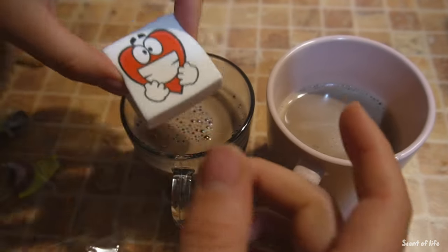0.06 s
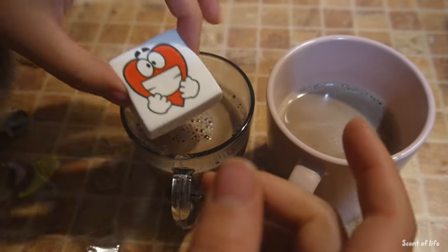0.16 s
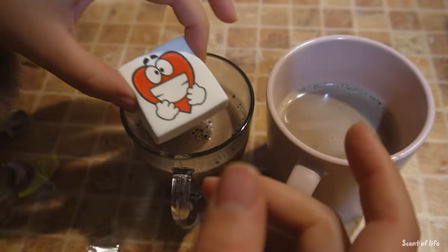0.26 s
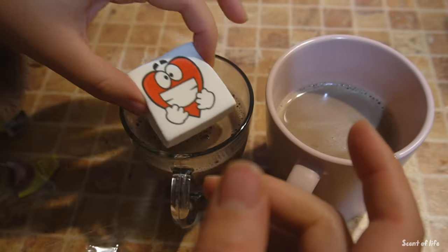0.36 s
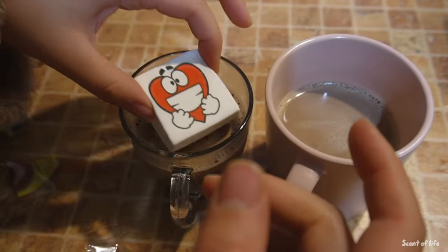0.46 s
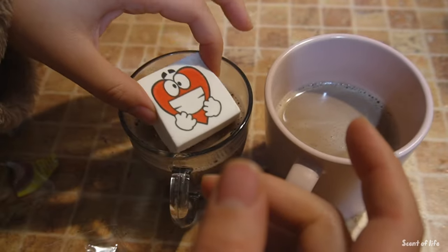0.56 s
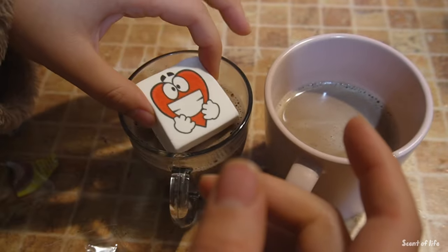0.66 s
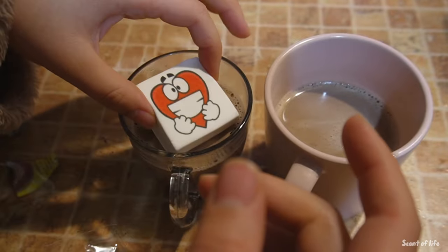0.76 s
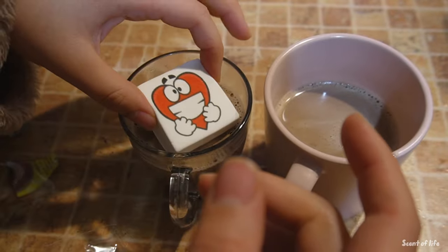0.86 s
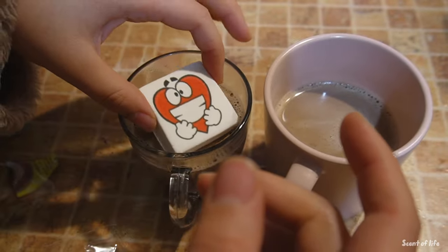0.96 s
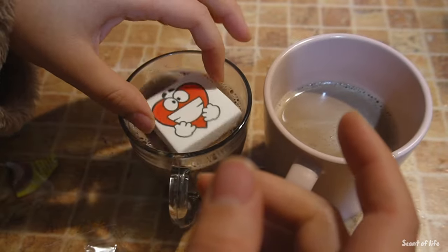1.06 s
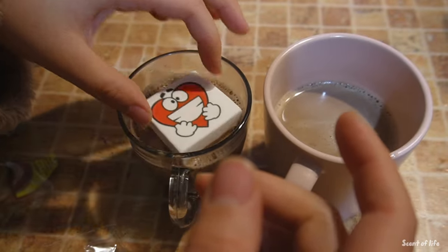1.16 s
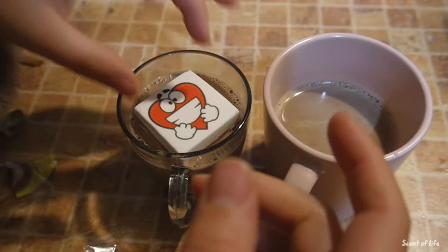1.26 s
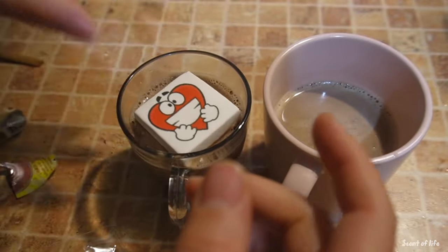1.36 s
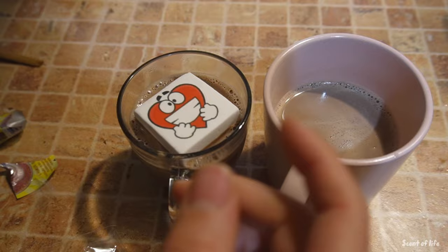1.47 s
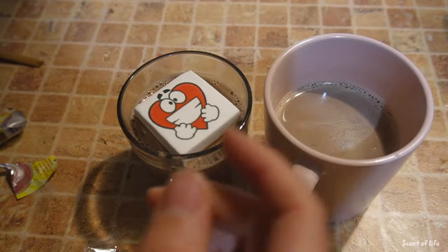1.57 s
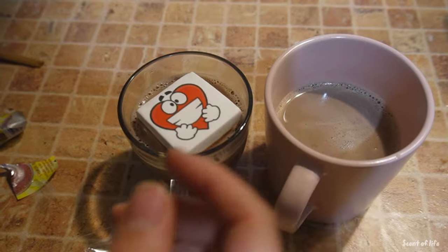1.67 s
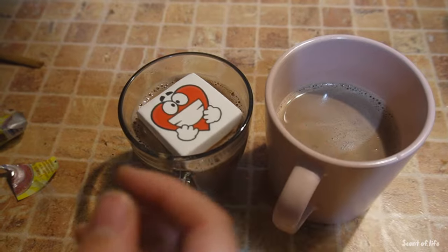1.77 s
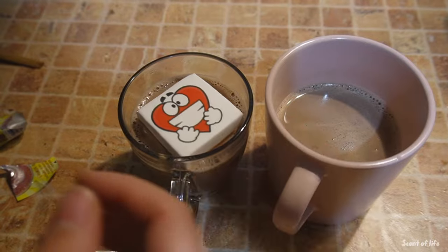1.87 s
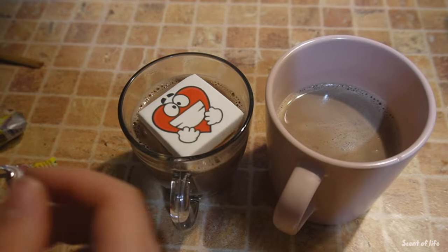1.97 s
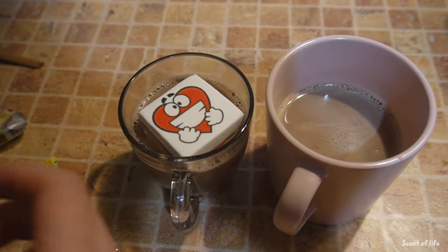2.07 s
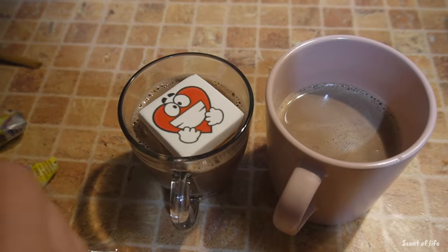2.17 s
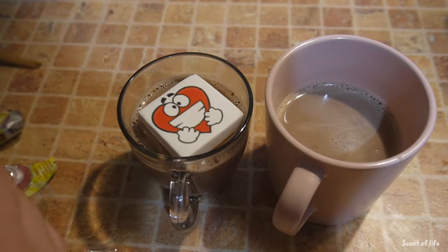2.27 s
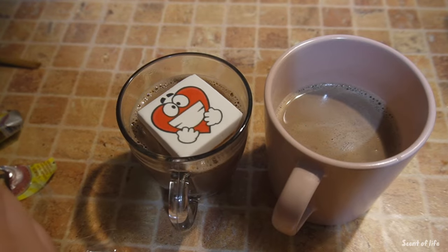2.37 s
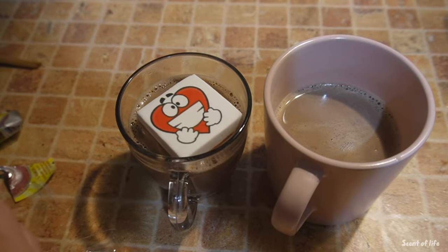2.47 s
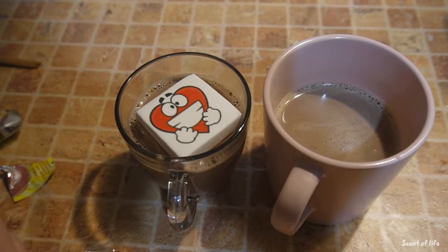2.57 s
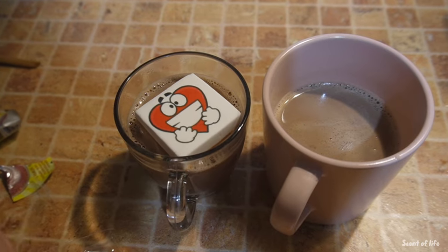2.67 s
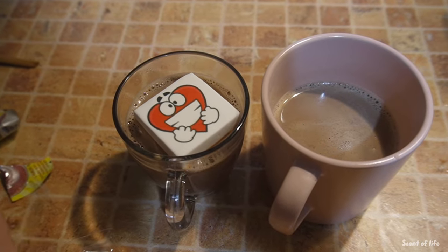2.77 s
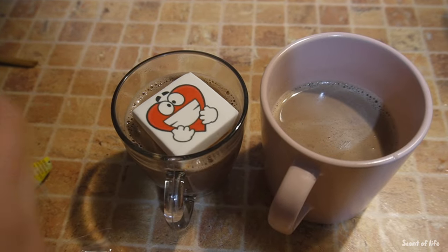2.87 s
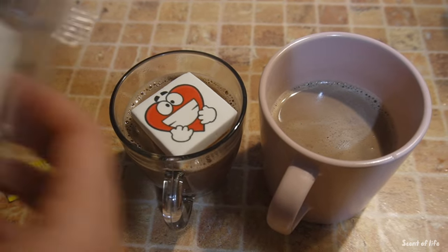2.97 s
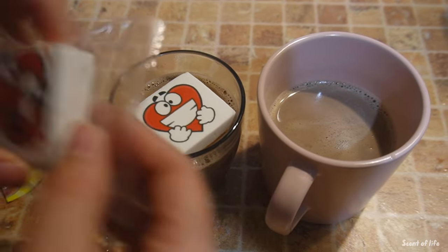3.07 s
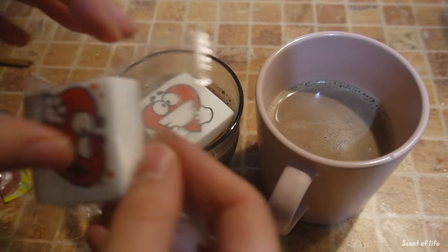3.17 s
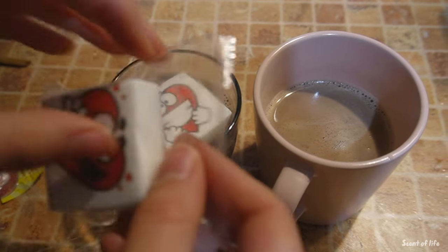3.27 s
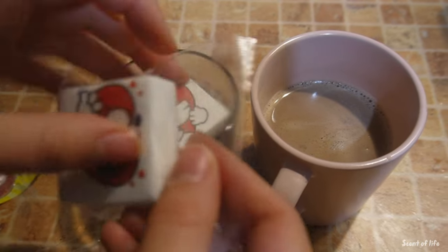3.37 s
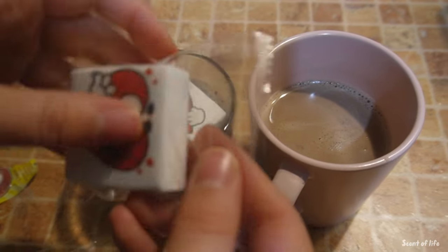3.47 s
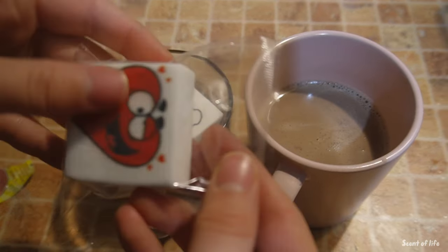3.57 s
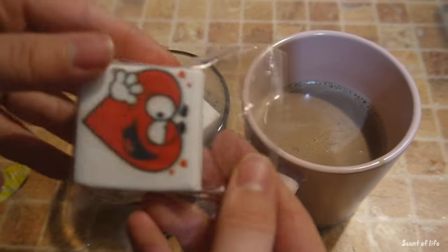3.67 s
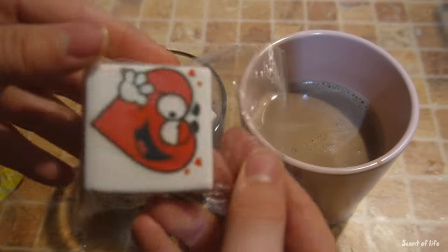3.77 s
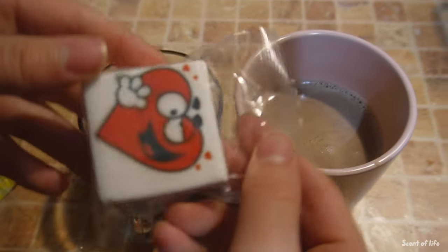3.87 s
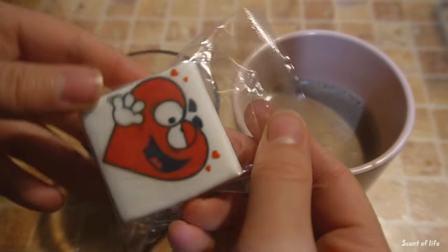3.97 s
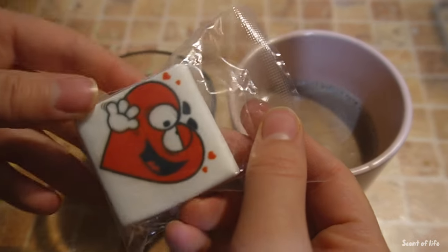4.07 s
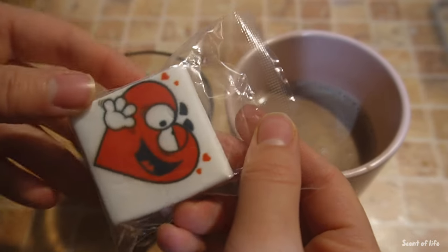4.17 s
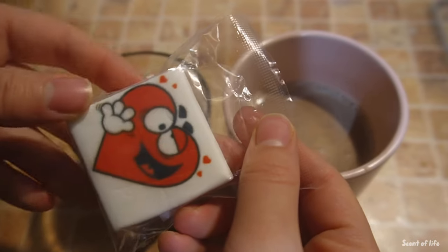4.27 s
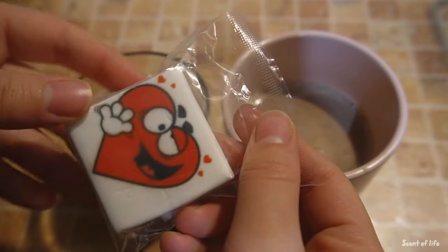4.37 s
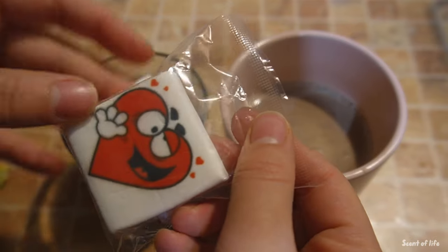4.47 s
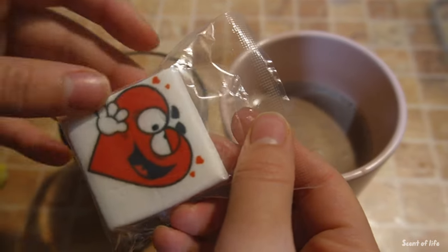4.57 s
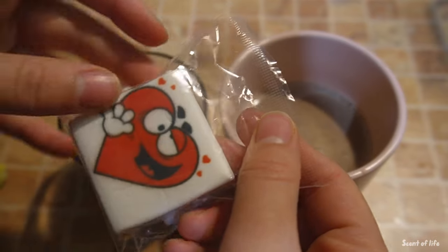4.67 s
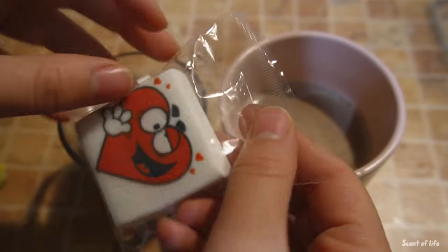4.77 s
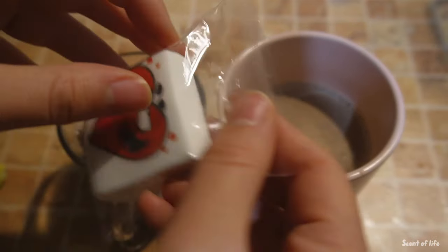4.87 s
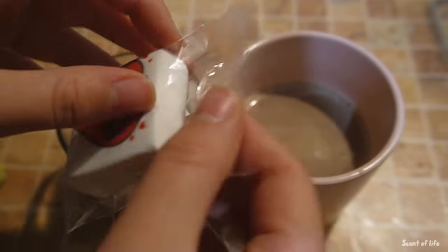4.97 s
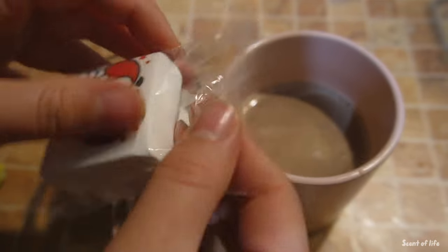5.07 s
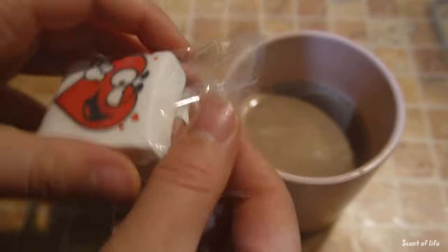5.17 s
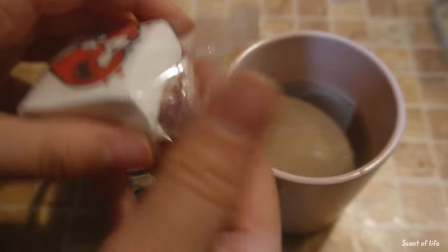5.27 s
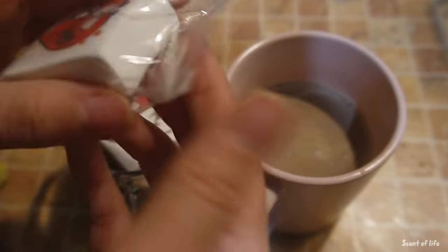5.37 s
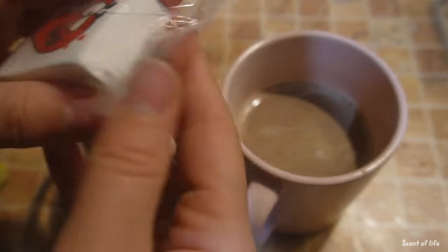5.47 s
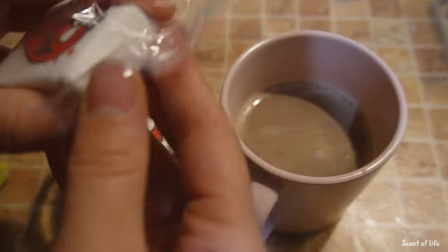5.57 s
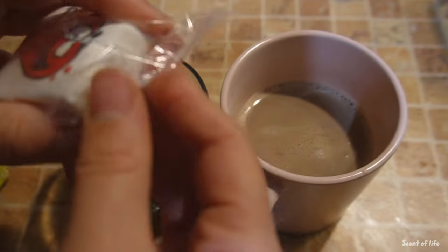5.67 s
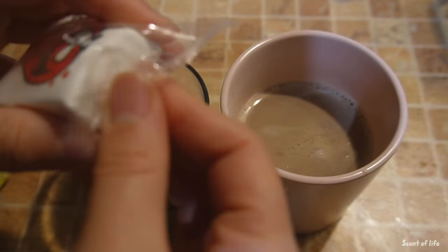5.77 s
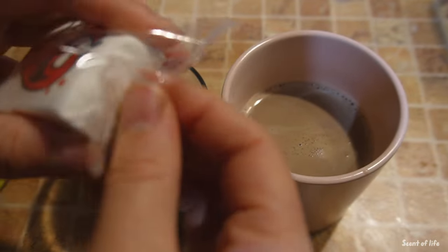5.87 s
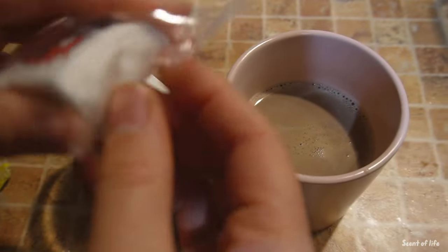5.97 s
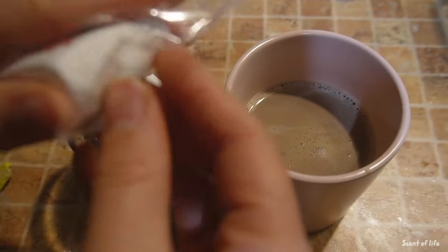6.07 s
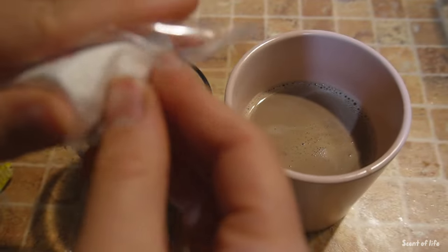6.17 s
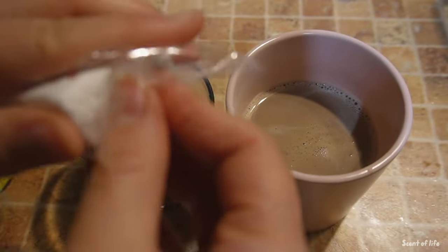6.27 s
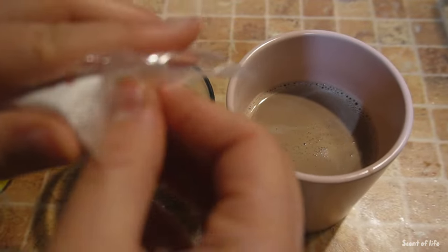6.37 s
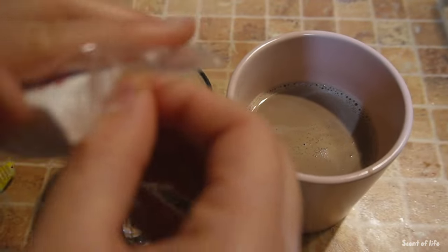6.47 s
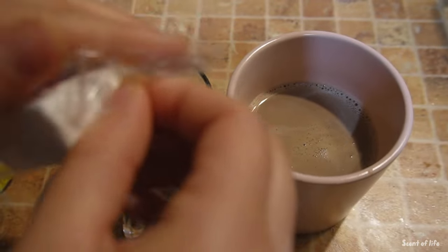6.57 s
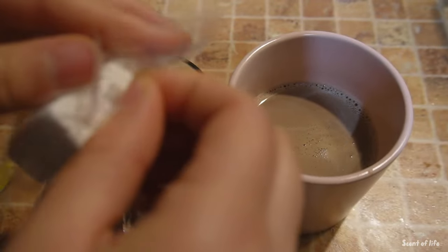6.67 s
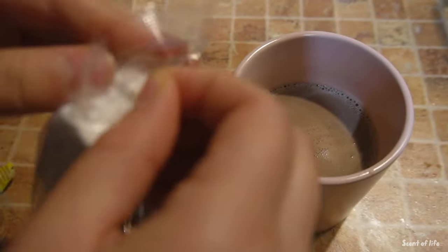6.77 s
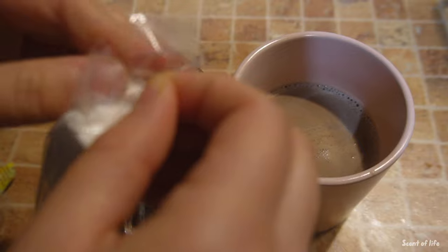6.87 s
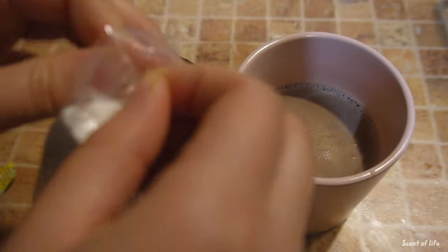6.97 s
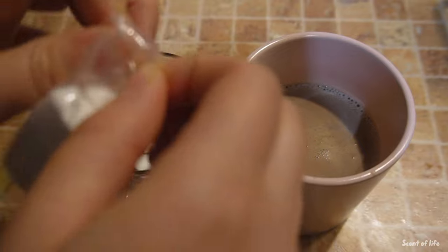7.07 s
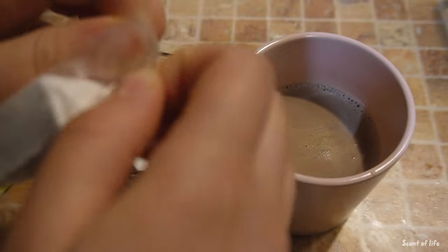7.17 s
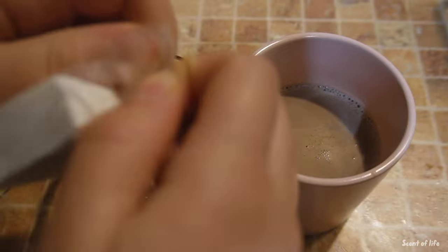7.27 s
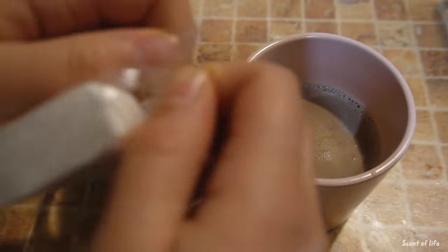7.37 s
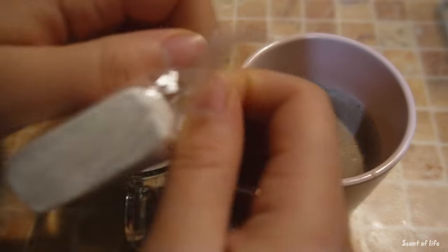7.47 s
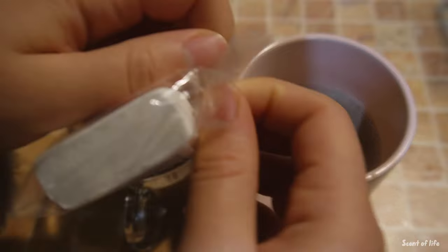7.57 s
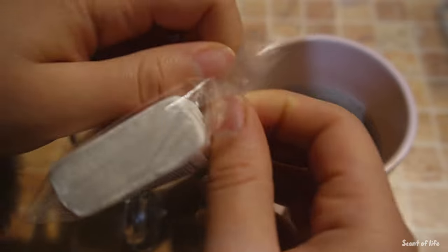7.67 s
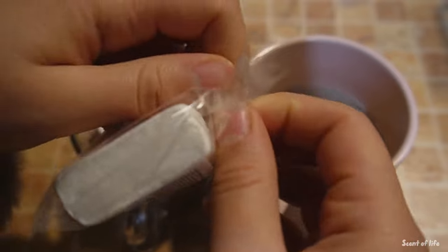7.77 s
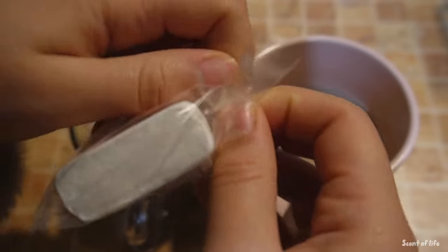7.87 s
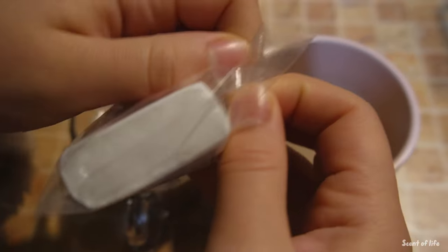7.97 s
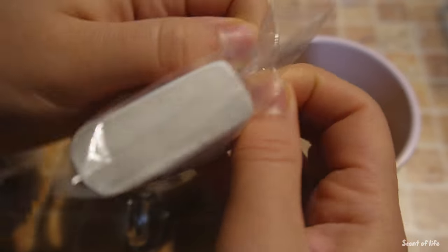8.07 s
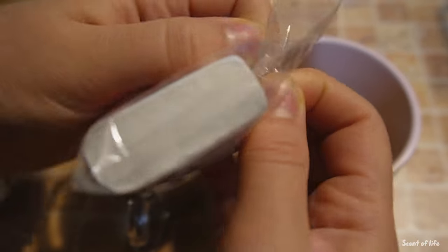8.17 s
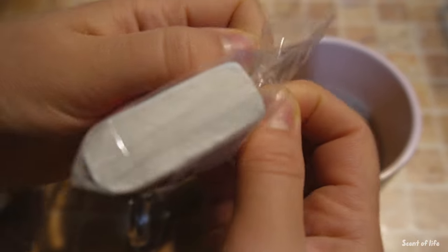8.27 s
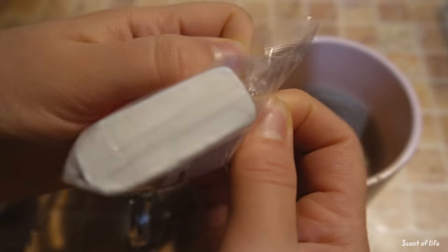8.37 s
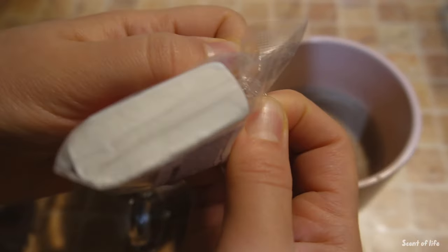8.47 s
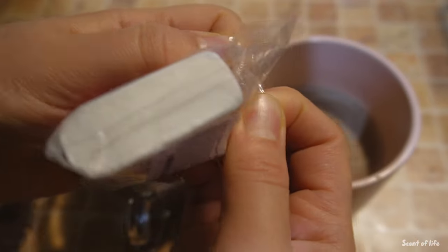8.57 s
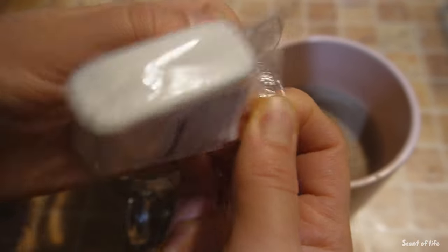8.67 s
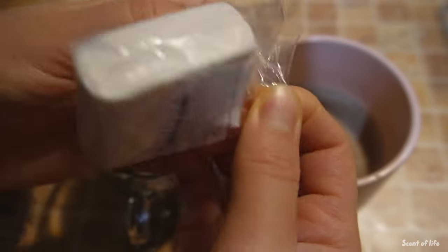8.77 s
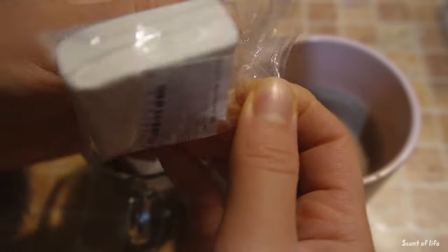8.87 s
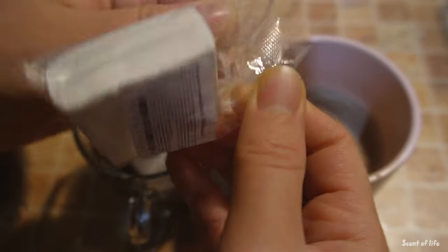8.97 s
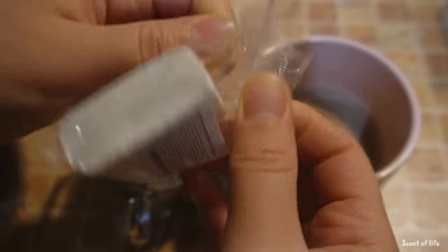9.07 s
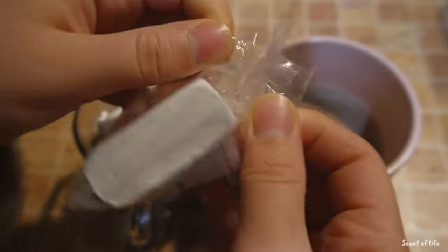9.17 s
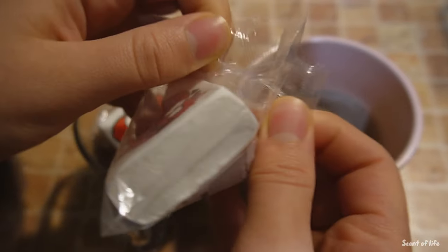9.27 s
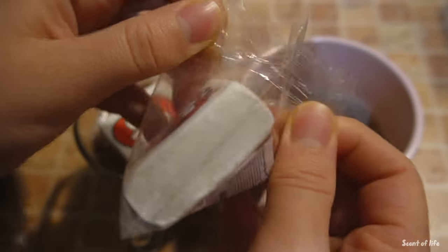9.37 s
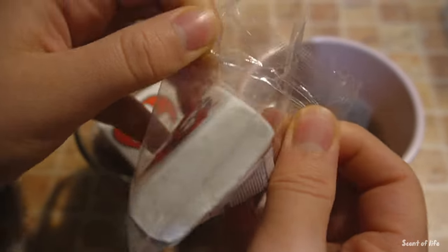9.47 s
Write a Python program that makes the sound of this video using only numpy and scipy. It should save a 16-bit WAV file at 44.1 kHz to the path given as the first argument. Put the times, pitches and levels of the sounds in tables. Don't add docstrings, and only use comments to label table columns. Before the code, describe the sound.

A quiet indoor room with soft hiss and a faint appliance hum, and a few barely audible touches. After two seconds a small item clatters lightly on the table, then stiff plastic film crinkles close to a stereo microphone. The crackling thins around four seconds, then becomes dense, sharp and loud as the wrapper is pulled, twisted, picked and torn, with dull flaps and finger rustle, continuing to the end.

```python
import sys
import numpy as np
from scipy import signal
from scipy.fft import rfft, irfft, next_fast_len
from scipy.io import wavfile
from scipy.ndimage import uniform_filter1d

SR = 44100
rng = np.random.default_rng(int(sys.argv[2]) if len(sys.argv) > 2 else 0)


def store_pcm(level_fs):
    pcm = np.round(np.clip(level_fs, -1, 1) * 32767).astype(np.int16)
    wavfile.write(sys.argv[1], SR, np.atleast_2d(pcm).T)


def voltage_ratio(level):
    return 10 ** (np.asarray(level, float) / 20)


N = 419391
APART_DB = -13


def rms_one(x):
    return x / np.sqrt(np.mean(x ** 2) + 1e-20)


def at_hz(points, hz):
    point_hz, value = np.transpose(points)
    return np.interp(np.log(hz), np.log(point_hz), value)


def convolve(x, response):
    size = next_fast_len(N + response.shape[-1])
    return irfft(rfft(x, size) * rfft(response, size), size)[..., :N]


def filtered(x, order, hz, kind):
    return signal.sosfilt(signal.butter(order, hz, kind, fs=SR, output="sos"), x)


# (pitch_hz, level_db per Hz)
HISS_COLOUR = [(18, -66), (30, -36), (84, -21), (147, -9.5), (192, -1), (270, -11.5), (402, -0.5),
               (567, -3.5), (2020, -2.5), (15100, -19), (16800, -46)]
HISS_DB = -63
# (pitch_hz, likeness 0 to 1)
HISS_LIKENESS = [(60, 0.83), (180, 1), (550, 0.87), (1650, 0.66), (4970, 0.25), (15000, 0.063)]
# (pitch_hz, width_hz, level_db)
HUM_TONES = [(101, 5.7, -80.5), (144, 36, -87), (203.5, 4.8, -82.5), (232.6, 5.2, -92), (405, 11, -89),
             (491, 24, -83)]
# (time_s, gain_db)
GAIN_CONTROL = [(0, 2.5), (3, 4), (5.1, 3.5), (5.5, -1.5), (5.9, -3), (6.3, 1), (6.9, 0), (7.2, -7),
                (7.5, 1.5), (8, 4), (8.7, -1.5), (9.51, 2.5)]


def quiet_room():
    hz = np.maximum(np.arange(N // 2 + 1) * SR / N, 10)
    mid, side, wobble = rfft(rng.standard_normal((3, N)))
    alike = np.clip(at_hz(HISS_LIKENESS, hz), 0, 1)
    both = np.sqrt(1 + alike) * mid + np.sqrt(1 - alike) * side * [[1], [-1]]
    hiss = voltage_ratio(HISS_DB) * rms_one(irfft(voltage_ratio(at_hz(HISS_COLOUR, hz)) * both, N))
    hum = 0
    for tone_hz, width_hz, level_db in HUM_TONES:
        tone = wobble / (1 + (2 * (hz - tone_hz) / width_hz) ** 2)
        hum = hum + voltage_ratio(level_db) * rms_one(irfft(tone, N))
    s, gain_db = np.transpose(GAIN_CONTROL)
    return voltage_ratio(np.interp(np.arange(N) / SR, s, gain_db)) * (hiss + hum)


def tail(t60_s, start_s, dull_hz, apart_hz):
    t = np.arange(SR // 2) / SR
    mid, side = rng.standard_normal((2, len(t))) * voltage_ratio(-60 * t / t60_s) * (t > start_s)
    side = voltage_ratio(APART_DB / 2) * filtered(side, 1, apart_hz, "high")
    both = filtered([mid + side, mid - side], 1, dull_hz, "low")
    return both / np.sqrt(np.sum(both ** 2) / 2)


def surroundings(x):
    echoes = tail(t60_s=0.45, start_s=0.01, dull_hz=10100, apart_hz=9000)
    return x + voltage_ratio(-14) * convolve(x, echoes)


# (start_s, level_db, thud_db)
TABLE_TAPS = [
    (2.219, -25, -29),
    (2.228, -26, -28),
    (2.243, -15.5, -17),
    (2.333, -22, -18),
    (2.415, -13.5, -41),
    (2.452, -20, -36),
    (2.471, -23, -41.5),
    (2.491, -24, -46),
]
# (pitch_hz, level_db, t60_s)
TRINKET_MODES = [(1130, -9, .025), (1950, -6, .022), (2420, -4, .022), (2860, -1, .022)]


def taps():
    t, out = np.arange(8192) / SR, np.zeros(N)
    thud_hz, thud_t60_s = 306, 0.049
    for s, level_db, thud_db in TABLE_TAPS:
        ring = np.zeros(len(t))
        for hz, db, t60_s in TRINKET_MODES:
            decay = voltage_ratio(db + rng.normal(0, 3) - 60 * t / t60_s)
            ring += decay * np.sin(2 * np.pi * hz * rng.normal(1, 1 / 50) * t)
        chatter = rng.standard_normal(4096) ** 3 * voltage_ratio(-31.5 - 60 * t[:4096] / 0.07)
        chatter[0] = 1
        ring = filtered(signal.fftconvolve(ring, chatter)[:len(t)], 2, 500, "high")
        thud = voltage_ratio(thud_db - 60 * t / thud_t60_s) * np.sin(2 * np.pi * thud_hz * t)
        thud *= 1 - np.exp(-t / 0.013)
        out[round(s * SR):][:len(t)] += voltage_ratio(level_db) * (voltage_ratio(-11.0) * ring + thud)
    return out


# (peak_s, level_db, time to swell by 10 dB swell_s; negative = at once)
FINGER_SQUEEZES = [(2.241, -25.5, -0.0447), (2.46, -20, 0.06), (3.098, -34.5, 0.17), (3.36, -52, -0.2),
                   (3.57, -56, 0.65), (4.0, -44.5, 0.1), (4.4, -64, 0.1), (4.7, -37.5, -0.04),
                   (4.972, -27, 0.06), (5.272, -28, 0.13), (5.56, -33.5, 0.18), (5.82, -31.5, 0.26),
                   (6.01, -34, 0.23), (6.27, -31, 0.21), (6.61, -35, 0.25), (6.95, -40.5, -0.3),
                   (7.2, -36.5, 0.8), (7.52, -41, -0.3), (7.94, -39.5, 0.1), (8.672, -37, 0.05),
                   (8.95, -31, -1.3), (9.25, -35, 0.5)]


def squeeze_db(s):
    at, db, swell = np.transpose(FINGER_SQUEEZES)[:, :, None]
    swell = np.maximum(swell, .015)
    slacken = swell * 0.4
    away = np.maximum((at - s) / swell, (s - at) / slacken)
    return 10 * np.log10(np.sum(voltage_ratio(db - 10 * away) ** 2, axis=0) + 1e-9)


def rub():
    mid, side = filtered(rng.standard_normal((2, N)), 2, [4200, 16000], "band")
    drag = filtered(rng.standard_normal((2, N)), 2, [1700, 7000], "band")
    steps = np.arange(0, N, 64)
    flicker = rms_one(uniform_filter1d(rng.standard_normal(len(steps)), size=6))
    flicker = np.interp(np.arange(N), steps, flicker)
    level_db = np.interp(np.arange(N), steps, squeeze_db(steps / SR))
    fade_db = np.minimum(level_db + 55, 0)
    rustle_db = -14 + 0.79 * level_db + fade_db + 6 * flicker
    rustle = voltage_ratio(rustle_db) * (drag[0] + 0.06 * drag[1] * [[1], [-1]])
    hiss_db = np.minimum(level_db, 0.74 * level_db - 13) - 15.0
    return rustle + voltage_ratio(hiss_db) * (mid + 3.0 * side * [[1], [-1]])


def buckle(s, peak_db, hz, size, slips_db, slips_s, scatter_db, scatter_s, broad_db, sharp, top):
    t = np.arange(size) / SR
    noise = rng.standard_normal((3, len(s), size))
    kind = rng.uniform(-1.12, 1, (3, len(s), 1))
    loose_db = 5 * kind[0] - 3 * np.log2(np.maximum(hz[:, None], 2500) / 5000)
    slips_env = voltage_ratio(slips_db + loose_db - 60 * t / slips_s)
    scatter_env = voltage_ratio(scatter_db + loose_db - 60 * t / scatter_s)
    slips = np.clip(noise[0] ** 3 / 4, -2, 2) * slips_env
    mid = slips + (noise[1] + np.roll(noise[1], 1, axis=1)) * 1.13 * scatter_env
    mid[:, 0] = np.sign(noise[0, :, 0])
    side = noise[2] * (scatter_env + slips_env)

    f = 1j * np.arange(size // 2 + 1) * SR / size
    x = f / hz[:, None]
    colour = x / sharp / (1 + x / sharp + x ** 2) + voltage_ratio(broad_db) / (1 + x / 6)
    other = x * 2 ** (0.55 * kind[1])
    colour += voltage_ratio(2.5 * kind[2]) * other / 6 / (1 + other / 4 + other ** 2)
    colour *= x ** 2 / (0.097 + 0.53 * x + x ** 2)
    colour /= 1 + 1.5 * x / top + (x / top) ** 2

    lean = rng.standard_normal((2, len(s), 1))
    port_db, port_lag_s = 0.7, 0.7e-5
    port = voltage_ratio(port_db * lean[0] / 2) * np.exp(np.pi * f * port_lag_s * lean[1])
    late = np.exp(-16 * np.pi * f / SR)
    jump = mid[:, :1]
    mid = (jump + (rfft(mid) - jump) / (1 + f / 22000)) * late
    side = voltage_ratio(APART_DB) * rfft(side) * f / (f + 9000) * late
    waves = irfft(colour * np.array([mid * port + side, mid / port - side]), size)
    waves *= (voltage_ratio(peak_db) / np.abs(waves.mean(axis=0)).max(axis=1))[:, None]

    out = np.zeros((2, N + size))
    at = (s * SR).astype(int)[:, None] + np.arange(size) - 8
    for channel, wave in zip(out, waves):
        np.add.at(channel, at, wave)
    return out[:, :N]


# (start_s, peak_db, ring_hz)
FAINT_TOUCHES = [(0.147, -42.5, 2800), (0.148, -50, 1000), (0.627, -46, 2820), (.732, -46.5, 7000),
                 (.7674, -50, 5500), (.9794, -52, 7000), (1.017, -46, 4970), (1.037, -39, 11000),
                 (1.051, -44, 9000), (1.045, -45, 3500), (1.055, -38, 10000), (1.059, -47, 3500),
                 (1.5856, -33, 2440), (1.616, -38.5, 1950), (1.618, -37, 4500)]


def touches():
    s, peak_db, hz = np.transpose(FAINT_TOUCHES)
    return buckle(s, peak_db, hz, size=8192, slips_db=-8.0, slips_s=0.021,
                  scatter_db=-35, scatter_s=0.43, broad_db=-25, sharp=2.4, top=2.2)


# (start_s, peak_db, ring_hz)
POUCH_FLAPS = [(3.014, -29, 850), (3.442, -37, 1100), (3.496, -33.5, 770), (3.878, -36, 810),
               (4.237, -36, 1070), (4.952, -18.5, 1180), (5.183, -31, 1200), (5.295, -25, 880),
               (5.562, -26.5, 1210), (6.284, -18, 1210), (6.572, -27, 1200), (6.632, -27, 1190),
               (7.616, -33, 1150), (7.697, -31.5, 1160), (7.752, -28, 1120), (8.106, -32.5, 964),
               (9.346, -23.5, 1270), (9.372, -22.5, 1270)]


def flaps():
    s, peak_db, hz = np.transpose(POUCH_FLAPS)
    flap = buckle(s, peak_db + 1.5, hz, size=2048, slips_db=-14.5, slips_s=0.012,
                  scatter_db=-13, scatter_s=0.045, broad_db=-1, sharp=1.8, top=6.1)
    return filtered(flap, 3, [680, 3500], "band")


# (start_s, peak_db,
# ring_hz)
EARLY_CREASES = [(2.1794, -20.5, 3700), (2.2293, -18, 2980), (2.243, -11, 3540), (2.3054, -20.5, 6230),
                 (2.3331, -16, 5160.0), (2.3383, -14.5, 6060), (2.3453, -12, 3300), (2.4158, -13, 3300),
                 (2.4638, -29, 5160), (2.4688, -19.5, 5960), (2.5403, -17.5, 7360), (2.5683, -35, 7760),
                 (2.7948, -19.5, 6130), (2.8099, -44, 5460.0), (2.8255, -12.5, 6950), (2.8776, -23, 6300),
                 (2.91, -8.5, 6960), (2.9232, -17, 7000.0), (2.9363, -27, 5700.0), (2.9425, -10.5, 7000),
                 (2.9977, -15.5, 4670), (3.0149, -17, 6530.0), (3.0236, -21, 4700.0),
                 (3.0543, -15.5, 5740.0), (3.0602, -13, 4700), (3.0726, -21, 6420.0), (3.0783, -16, 8820.0),
                 (3.094, -10, 8380.0), (3.1106, -21, 3900), (3.1206, -6.5, 6700), (3.1325, -16.5, 5400),
                 (3.1705, -20.5, 5140.0), (3.1779, -28, 4570.0), (3.1992, -21.5, 4360),
                 (3.2089, -21.5, 3100), (3.2411, -27, 5480),
                 (3.3065, -15, 4700), (3.3303, -11.5, 3900), (3.3486, -16.5, 5770), (3.4207, -14, 4900),
                (3.444, -36, 3540.0), (3.4764, -17.5, 6960), (3.482, -20, 5090.0), (3.4967, -15, 4520.0),
                (3.5113, -20, 5660.0), (3.5295, -19, 4540.0), (3.537, -14.5, 6700), (3.553, -16, 3280.0),
                (3.576, -15, 3700), (3.5957, -14.5, 4960), (3.6448, -19.5, 4740), (3.6958, -23, 3200),
                (3.7365, -21.5, 5350), (3.7652, -23, 4460), (3.7911, -13.5, 3580), (3.7995, -11.5, 8800),
                (3.8023, -25, 6250.0), (3.9006, -12, 6200), (3.964, -26, 4640), (4.2312, -32, 5040),
                (4.2369, -29.5, 3440), (4.359, -12, 6860), (4.4382, -17.5, 7040), (4.447, -27, 5750.0),
                (4.4762, -23, 4750), (4.614, -30.5, 6200), (4.748, -13.5, 6000), (4.8534, -21, 4050),
                (4.882, -32, 4360),
                 (4.895, -7, 5440), (4.902, -12, 6900), (4.91, -12, 7800), (4.9321, -20, 5680.0),
                (4.9527, -13.5, 5900), (4.975, -14, 6570), (4.9847, -12.5, 6000), (4.997, -18, 5700),
                (5.003, -10.5, 5560), (5.023, -19, 6050), (5.05, -16.5, 4660), (5.1132, -11, 5700),
                (5.133, -14, 4400), (5.1374, -17, 6700), (5.1572, -15.5, 6800), (5.1838, -11, 5670),
                (5.193, -31, 4970), (5.2223, -19, 6160), (5.2291, -14, 5060), (5.2328, -10, 5900),
                (5.244, -22, 8260.0), (5.2668, -23, 8440.0), (5.274, -18, 5210.0), (5.292, -12, 6400),
                (5.317, -12, 6400), (5.325, -17.5, 6070.0), (5.333, -12, 5360), (5.3517, -12, 7200),
                (5.373, -5, 6300), (5.388, -18, 9600), (5.4094, -20.5, 5750), (5.415, -12.5, 7190.0),
                (5.4508, -13, 6300), (5.4565, -11, 4470), (5.468, -13, 5130), (5.4722, -10.5, 5700),
                (5.4775, -12.5, 6950), (5.4885, -23, 6980.0), (5.4955, -15, 6620.0),
                 (5.5073, -16, 6650), (5.525, -10.5, 5700), (5.5446, -6, 7850.0), (5.55, -21, 7570.0),
               (5.5633, -13, 5360), (5.576, -20, 5330.0), (5.5857, -18, 6540), (5.6152, -13, 6650),
               (5.622, -18, 6370.0), (5.6261, -11.5, 3480), (5.632, -13.5, 4240), (5.6373, -11, 6950),
               (5.6437, -20, 4200), (5.6484, -12, 5300), (5.6665, -15, 9000), (5.6742, -13, 5930),
               (5.6883, -10.5, 6540), (5.7082, -11, 8800), (5.7332, -12.5, 3240), (5.7522, -7.5, 10500),
               (5.767, -19, 8170.0), (5.774, -11, 3250), (5.7814, -21, 5600), (5.787, -15, 5500),
               (5.795, -20, 3720), (5.8134, -24, 4050.0), (5.8232, -21, 7880.0), (5.8389, -10.5, 5900),
               (5.8487, -12, 7300), (5.8588, -15, 6200), (5.8655, -6, 6750), (5.8795, -11.5, 6900),
               (5.905, -13, 10160.0), (5.9133, -16, 11200), (5.949, -22, 3650), (5.9608, -10, 6010.0),
               (5.9727, -19, 6940.0), (5.988, -4.5, 3340), (5.9923, -8.5, 6210.0), (6.002, -18, 3800),
               (6.013, -20, 5300), (6.0349, -11.0, 5300),
                 (6.056, -18, 6080.0), (6.0885, -16, 4280), (6.0988, -17, 8640.0), (6.105, -12, 4700),
                 (6.1097, -21, 4450), (6.1289, -19, 4020), (6.1382, -9.5, 4430), (6.1515, -17, 6450),
                 (6.1658, -7, 8570.0), (6.1835, -18, 5760), (6.223, -21, 5200), (6.2285, -9.5, 4080),
                 (6.248, -10, 7700.0), (6.2731, -15, 3650), (6.286, -7, 4340), (6.3037, -17, 4800),
                 (6.326, -14, 6160.0), (6.332, -17, 6380.0), (6.3466, -15, 3650), (6.355, -29, 4480),
                 (6.384, -26, 5500.0), (6.3894, -12, 5100), (6.415, -9, 4760), (6.4253, -19, 7400),
                 (6.4441, 5, 4200), (6.4567, -15, 7440.0), (6.462, -4, 5600), (6.4875, -19, 5640),
                 (6.5114, -0.5, 5800), (6.5189, -27, 11370.0), (6.5462, -10, 9350.0), (6.554, -13, 5500),
                 (6.575, -11, 3280), (6.5814, -15.5, 4410.0), (6.589, -17, 4230), (6.6014, 0, 5650),
                 (6.6271, -8, 7550), (6.6326, -10.5, 4150), (6.6667, -14, 6400), (6.6922, -16, 6600)]
# (start_s, peak_db,
# ring_hz)
LATE_CREASES = [(6.717, -16.0, 7100), (6.7226, -10.5, 3700), (6.7265, -20, 5470.0), (6.7487, -9, 8600.0),
                (6.759, -14, 6500), (6.7668, -26, 6900), (6.775, -11.5, 5800), (6.8025, -17, 7600),
                (6.8257, -26, 3220), (6.8448, -16.5, 3820), (6.8583, -14.5, 6800), (6.8644, -15, 4100),
                (6.8731, -10.5, 6250), (6.882, -22, 4570), (6.891, -29, 5760), (6.9368, -7, 6660),
                (6.9468, -18, 3200), (6.98, -9, 5000), (6.986, -11, 5470), (7.0033, -18, 9600),
                (7.0095, -22, 6840.0), (7.0164, -17, 4940), (7.037, -10.5, 6470), (7.067, -12.5, 4800),
                (7.0785, -13, 5240), (7.0916, -29, 4200), (7.1233, -14, 6640), (7.1462, -17, 6200),
                (7.1588, -10.5, 6660), (7.1694, -20, 5200), (7.1788, -12, 5150), (7.1995, -11.5, 5130),
                (7.213, -14, 5800), (7.2365, -12, 3960), (7.2459, -16.5, 5730), (7.273, -13, 6340),
                (7.2971, -7, 10100), (7.338, -16.5, 5770),
                (7.409, -22, 6470), (7.429, -22, 3900), (7.4352, -13.5, 5280.0), (7.4492, -9, 9100),
                (7.4633, -9.5, 3960), (7.496, -22, 5770.0), (7.5115, -15, 6600), (7.5173, -23, 8130.0),
                (7.5223, -12.5, 6800), (7.529, -17.0, 3540), (7.5443, -6, 6900), (7.5555, -20, 6850.0),
                (7.5925, -14, 7500), (7.6163, -26, 4760.0), (7.628, -19.0, 8350), (7.6392, -24, 7190.0),
                (7.6735, -13, 4240), (7.727, -27, 3640.0), (7.7535, -32, 3520), (7.76, -12, 3600),
                (7.768, -8.5, 6440), (7.868, -18.5, 3300), (7.872, -20, 5500), (7.908, -26, 5010.0),
                (7.9199, -6, 6240), (7.934, -25, 5100), (7.9537, -11.5, 5750), (7.966, -15.5, 4170),
                (8.0182, -22, 6340), (8.023, -4, 8560), (8.036, -16, 3260), (8.069, -20, 5270),
                (8.0775, -11.5, 3700), (8.0955, -21, 7740.0), (8.104, -19, 4700.0), (8.109, -13.5, 5340.0),
                (8.1359, -10.5, 2970), (8.1494, -11, 4120), (8.164, -8.5, 6150), (8.173, -12.5, 3970),
                (8.1878, -14.5, 3800), (8.236, -22.5, 5000), (8.26, -7, 9500), (8.2705, -11.5, 4350),
                (8.2932, -3, 9380.0), (8.3072, -16, 7500), (8.3232, -22, 8300), (8.3512, -10.5, 8000),
                (8.3728, -25.5, 3960),
                (8.414, -30, 3840), (8.4303, -23, 4760), (8.4437, -10, 5800), (8.5062, -14.5, 4340),
                (8.526, -19.5, 6100), (8.555, -22, 7390.0), (8.5905, -11.5, 5200), (8.597, -17, 3320),
                (8.608, -11, 5800), (8.6266, -20.5, 3560), (8.638, -6.5, 7450), (8.646, -13, 5270),
                (8.6553, -12, 7520.0), (8.6606, -11.5, 5100), (8.6738, 3, 5590.0), (8.692, -20, 4840),
                (8.7, -12.5, 4960), (8.7105, -4, 4270), (8.7233, -10, 3200), (8.729, -16, 3300),
                (8.734, -9.5, 6750), (8.7498, -17, 5150.0), (8.7916, -13.5, 6430.0), (8.8053, -12, 4400),
                (8.8198, -12.5, 4060), (8.826, -18, 5630), (8.8437, -16, 4260.0), (8.8534, -17, 4120),
                (8.861, -15, 6140), (8.868, -25, 3870.0), (8.9033, -1, 7350), (8.9218, -16.5, 4960),
                (8.9301, -17, 4950),
                (8.9532, -22, 5520.0), (8.958, -5, 4260), (8.9663, -12, 4000), (8.978, -16, 3740),
                (9.0565, -19, 7240), (9.068, -30, 5000.0), (9.098, -10, 8160), (9.106, -11.5, 5500),
                (9.1174, -21, 10300), (9.1406, -15.5, 6610.0), (9.168, -14, 5500), (9.174, -15, 4640),
                (9.201, -13, 5800), (9.2115, -9, 7900), (9.226, -28, 10720.0), (9.2327, -8, 4200),
                (9.2434, -23, 5000), (9.2627, -11.5, 6800), (9.2724, -18, 4430), (9.2773, -14, 10440.0),
                (9.288, -17, 5060), (9.3107, -14, 3450), (9.3482, 0, 9200), (9.3609, -11, 4960),
                (9.3768, -0.5, 3970), (9.3918, -11, 8500), (9.405, -19, 7840), (9.4363, -13.5, 3600),
                (9.4643, -10, 3800), (9.5023, -10.5, 4430)]
# (start_s, peak_db, ring_hz)
FURTHER_CREASES = [
    (2.1523, -33, 2970),
    (2.221, -27, 3000),
    (2.904, -22, 4870),
    (4.512, -16.5, 7100),
    (7.701, -19, 3520),
]


def strong_creases():
    opening = EARLY_CREASES
    ending = LATE_CREASES
    return np.transpose(sorted(opening + ending + FURTHER_CREASES))


def crackle():
    draw = rng.random((5400, 4))
    snap_s, snap_db, snap_hz = strong_creases()
    which, wait = np.repeat(rng.random((2, 1350)), 4, axis=1)
    parent = (which * len(snap_s)).astype(int)
    after_s = -.012 * np.log(wait + 1e-9) - .003 * np.log(draw[:, 0] + 1e-9)
    size_db = 5.8 * np.minimum(-np.log(draw[:, 1] + 1e-9), 2.3)
    hz = 0.77 * snap_hz[parent] * 2 ** (1.38 * (draw[:, 2] - draw[:, 3]))
    s = np.minimum(snap_s[parent] + after_s, 9.5)
    peak_db = 0.74 * snap_db[parent] + 0.39 * squeeze_db(s) - 250 * after_s + size_db - 7
    small = buckle(s, peak_db, hz, size=384, slips_db=-12, slips_s=0.002,
                   scatter_db=-14.0, scatter_s=0.0052, broad_db=2.5, sharp=7.6, top=4.0)
    return filtered(small, 2, 1500, "high")


def snaps():
    s, peak_db, hz = strong_creases()
    loudest_db = -9
    return buckle(s, np.minimum(peak_db, loudest_db), 0.96 * hz, size=1024, slips_db=-15, slips_s=0.012,
                  scatter_db=-25, scatter_s=.028, broad_db=-11, sharp=3.2, top=9)


def film():
    sheet = snaps() + touches() + crackle() + rub()
    return filtered(sheet, 6, 545, "high") + flaps()


# (time_s, lean_db)
HANDS_LEAN = [(1.9, -2), (2.15, 3.5), (2.6, 1), (2.8, 1), (3.3, -0.4), (9.0, -0.4), (9.51, -0.5)]


def scene():
    s, lean_db = np.transpose(HANDS_LEAN)
    place = voltage_ratio(np.interp(np.arange(N) / SR, s, lean_db) / 2 * [[1], [-1]])
    return surroundings(place * (film() + taps())) + quiet_room()


def band_limit(x):
    return signal.sosfilt(signal.butter(12, 16970, fs=SR, output="sos"), x)


def record(dry):
    limit = .45
    rounded = limit * np.tanh(dry / limit)
    no_bass = filtered(rounded, 2, 80, "high")
    treble_cut = signal.cheby2(12, 24, 16250, fs=SR, output="sos")
    mix = signal.sosfilt(treble_cut, no_bass)
    return band_limit(mix)


dry = scene()
out = record(dry)
store_pcm(out)
```